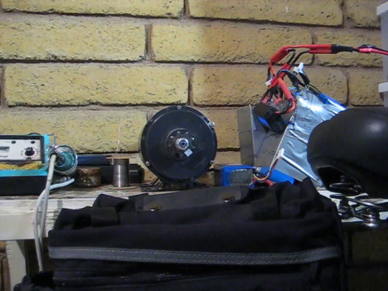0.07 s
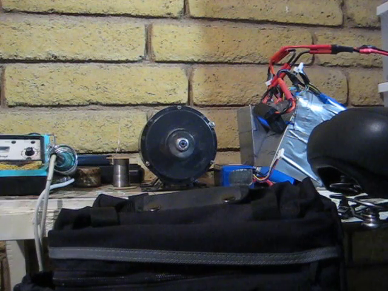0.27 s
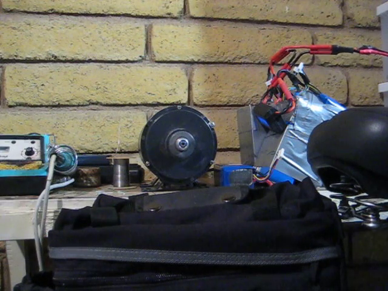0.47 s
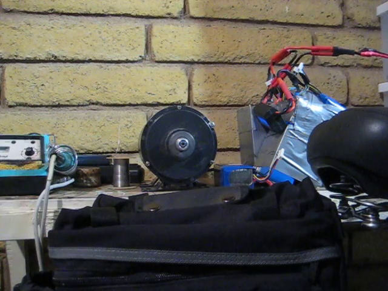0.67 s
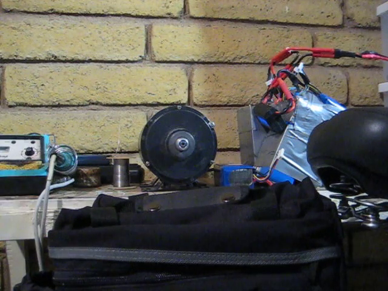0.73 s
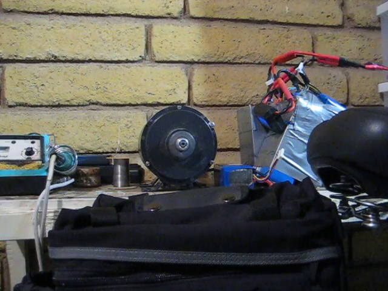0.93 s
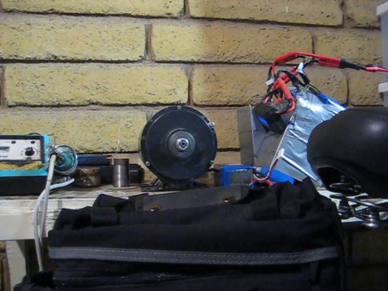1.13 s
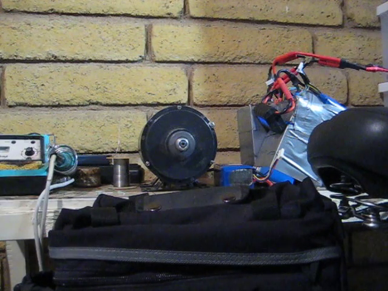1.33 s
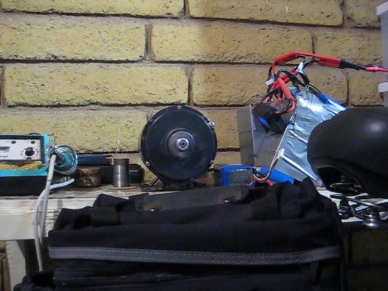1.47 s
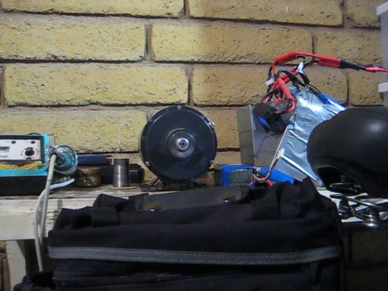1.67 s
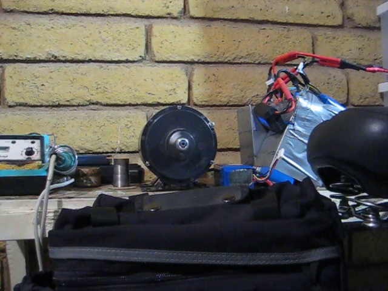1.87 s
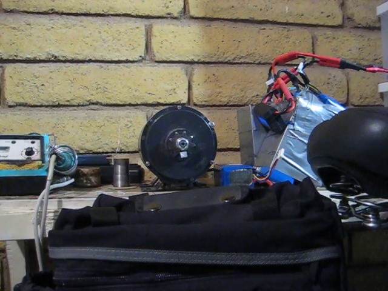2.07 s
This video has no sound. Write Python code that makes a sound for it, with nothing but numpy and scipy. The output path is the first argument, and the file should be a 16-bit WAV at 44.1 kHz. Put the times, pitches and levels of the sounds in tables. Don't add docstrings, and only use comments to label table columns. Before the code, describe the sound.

A small brushless electric motor on a workbench: faint room hum, a double click at 0.2 s, then a rough, gritty whine climbing fast until about 0.57 s. It holds a steady, hard, buzzing whine with thin high whistling until a sharp clack near 1.3 s. The pitch then falls, growling and rattling, fading to tiny knocks around 2 s, with a short room echo, close microphone.

```python
import sys
import numpy as np
from scipy import signal
from scipy.fft import rfft, irfft
from scipy.io import wavfile

SR = 44100
rng = np.random.default_rng(int(sys.argv[2]) if len(sys.argv) > 2 else 0)


def volts(x):
    e = np.asarray(x, float) / 20
    return 10 ** e


def transcribe(signal):
    frames = np.atleast_2d(signal).T
    limited = np.clip(frames, -1, 1)
    pcm = np.round(limited * 32767).astype(np.int16)
    wavfile.write(sys.argv[1], SR, pcm)


N = 92610
T = np.arange(N) / SR

FULL_HZ, STEPS_PER_TURN, CHOPPER_HZ = 540.82, 16, 16048.
BRAKE_ON_S, DRIVE_OFF_S, WHISTLE_TOP_HZ = 1.28, 1.54, 13600
FRONT_PASSES, REAR_PASSES = 4.9262, 4.9068

# t/s, speed/share of full
SPEED = [(.197, .1), (.24, .231), (.3, .337), (.35, .416), (.398, .473), (.448, .575), (.472, .655),
         (.518, .812), (.568, 1), (1.275, 1), (1.31, .94), (1.38, .843), (1.46, .74), (1.54, .64),
         (1.63, .53), (1.77, .355), (1.92, .165), (2.0, .07)]
# t/s, notch shake level/dB, drive current level/dB, magnet level/dB, rattle level/dB
RUN = [(.197, 7, -18, -25, -5.5), (.25, 6, -2, -19, 10), (.32, 10, 0.5, -13, 11), (.37, 3, 0.5, 1.5, 8),
       (.44, 2, -0.5, 5.5, 7.5), (.485, 0, 1, -16, 9), (.568, 1, 0, -1, 7.5), (.6, 0, 0, 0, 0),
       (1.275, 0, 0, 0, 0), (1.3, -2, -13, -6, 6), (1.38, -2, -7.5, -2, 9.5), (1.5, 3.5, -8, -2, 4.5),
       (1.57, 5.5, -15, 3.5, 1), (1.64, 7, -22.5, 4.5, -2.5), (1.7, 4.5, -28, -5.5, -6),
       (1.81, 9, -45, -6, -24), (1.92, 2, -44, -19, -35), (1.97, -9, -57, -30, -40)]
# t/s, once-a-step cogging level/dB, bright grit level/dB, end-bell ring level/dB (not sounded)
SHAKE = [(.197, -25, -20, -24), (.25, -25, 7.5, -8), (.4, -14, 8.5, -4), (.46, -9, 8, -1), (.52, -8, 9, 1),
         (.555, 6.5, 10, 2), (.6, -0.5, 8, -17), (1.275, 0.5, 8, -21), (1.31, 8, 8, -9), (1.39, 2.5, 9, -2),
         (1.44, 12, 5, 2), (1.52, 12, -4, 12), (1.56, 10, -15, 2.5), (1.62, 6, -28, 0),
         (1.67, -18, -25, -10), (1.8, -25, -30, -21), (1.97, -36, -40, -32)]
# rate/multiple of the step rate, level at full speed/dB
DRIVE = [(3, -40), (4, -21), (5, -33), (7, -56), (8, -45), (9, -52), (10, -48), (11, -52), (13, -56),
         (14, -53), (15, -58), (16, -62), (17, -64)]
# rate/multiple of the step rate, level as if at full speed/dB
PULL = [(4, -27.5), (5, -26.5), (6, -38), (7, -46), (8, -45.5), (9, -50.5), (10, -49), (11, -55.5),
        (12, -57), (13, -58.5), (14, -61)]
# rate/cycles per turn, level at full speed/dB
COGGING = [(30, -58), (32, -48.5), (35, -45.5), (36, -53)]
# rate/cycles per turn, level at full speed/dB
ROTOR = [(14, -58), (15, -60), (17, -42), (18, -37), (19, -31), (20, -46), (21, -51), (22, -58), (33, -62),
         (36, -60), (37, -54), (44, -56), (46, -58), (49, -44), (50, -53), (62, -40), (63, -46), (65, -40),
         (71, -42), (81, -47), (82, -42), (86, -46), (130, -52), (132, -52), (158, -55)]
# rate/multiple of the ball pass rate, level at full speed/dB
FRONT = [(11, -54), (12, -44), (14, -46), (15, -39), (16, -40), (17, -33), (21, -57), (25, -52)]
# rate/multiple of the ball pass rate, level at full speed/dB
REAR = [(18, -40), (19, -29), (20, -39), (28, -52), (35, -52)]
# distance below the chopper/steps, level at full speed/dB
CHOPS = [(2, -75), (3, -75), (4, -64), (5, -70), (6, -60), (7, -61), (8, -64), (9, -56), (10, -60),
         (11, -57), (12, -66), (14, -53), (16, -53), (18, -58), (20, -52)]
# t/s, peak level/dB
LURCHES = [(0.434, -11), (1.547, -13), (1.564, -19), (1.609, -11), (1.639, -13.5), (1.722, -18.5),
           (1.744, -21), (1.799, -19), (1.883, -25.5), (1.892, -26), (1.904, -25.5), (1.916, -25.5)]
# f/Hz, width/Hz, level/dB
HOUSING = [(280, 80, -18), (637.5, 52, -1.5), (1146, 290, -21.5), (1570, 303, -13), (1964, 150, -5.5),
           (2236, 74, 0), (2432, 116, -0.5), (2790, 220, -1), (3123, 63, 4), (3334, 100, -9),
           (4410, 500, -15.5), (5640, 1200, -19.5), (8000, 1700, -27), (12200, 3300, -45.5)]
# f/Hz, width/Hz, level/dB
SHELL = [(3690, 260, -10.5), (4280, 460, 2), (5120, 480, -4), (5860, 410, -5), (6970, 450, -8),
         (7570, 350, -8), (8400, 690, -11.5), (9880, 270, -14), (11500, 1400, -25.5), (12800, 700, -23.5)]
# f/Hz, width/Hz, level/dB
END_BELL = [(3100, 39, 0.5), (2846, 94, -9.5), (2310, 52, -14)]
# f/Hz, width/Hz, level/dB
MOUNT = [(279, 70, -13), (648.7, 34, 2.5)]
# f/Hz, width/Hz, level/dB
WHISTLE = [(13360, 1600, 0.5), (9750, 310, 4.5), (8000, 7700, -1.5)]
# t/s, peak level/dB, dullness/0-1
CLACKS = [
    (0.199, -27, 0.44),
    (0.2131, -28, 0.4),
    (1.293, -6.5, 0.38),
    (1.3, -20.5, 0.6),
    (1.536, -30, 0.4),
    (1.8027, -44, .3),
    (1.992, -30, 1),
    (2.008, -37, 0.3),
    (2.012, -25, 0.6),
    (2.021, -32, 0.6),
]
# f/Hz, level/dB, time to fall 60 dB/s
BENCH = [(296, -15, 0.081), (1010, -28, 0.033), (1360, -2, 0.023), (1900, 7, 0.012), (2840, 5, 0.0089),
         (5700, 1.5, 0.0092), (8380, -4, 0.0092), (9320, -2, 0.0093), (12100, -39, .008)]
# f/Hz, level/dB
AIR = [(25, -10.5), (100, -3.5), (330, -4.5), (650, -4), (1300, -11.5), (4000, -18.5), (10000, -24),
       (16000, -26)]
# f/Hz, level/dB
HUM = [(99, -62), (7558, -64), (5932, -72)]


def in_time(rows):
    s, *columns = np.transpose(rows)
    return [np.interp(T, s, column) for column in columns]


def drift(rate):
    knots = rng.standard_normal(int(N / SR * 60) + 2)
    return np.interp(T * rate, np.arange(len(knots)), knots)


def butter(x, order, hz, kind="low"):
    return signal.sosfilt(signal.butter(order, hz, kind, fs=SR, output="sos"), x)


def resonators(peaks):
    for k, (hz, width, db) in enumerate(peaks):
        r = np.exp(-np.pi * width / SR)
        b = volts(db) * (-1) ** k * (1 - r * r) / 2 * np.array([1, 0, -1])
        yield b, [1, -2 * r * np.cos(2 * np.pi * hz / SR), r * r]


def ring(x, peaks):
    return sum(signal.lfilter(b, a, x) for b, a in resonators(peaks))


def ring_gain(peaks, hz):
    return abs(sum(signal.freqz(b, a, [hz], fs=SR)[1][0] for b, a in resonators(peaks)))


def tones(turns, rows, peaks, base_hz=0, flutter_db=0):
    out = 0
    for per_turn, db in rows:
        full_speed_hz = base_hz + per_turn * FULL_HZ / STEPS_PER_TURN
        level_db = db + 0.6 * drift(12.1) + flutter_db * drift(35.1)
        gain = volts(level_db) * np.sqrt(2) / ring_gain(peaks, full_speed_hz)
        out = out + gain * np.sin(2 * np.pi * (base_hz * T + per_turn * turns + rng.random()))
    return out


def motor():
    notch_db, current_db, magnet_db, rattle_db = in_time(RUN)
    cog_db, bright_db, bell_db = in_time(SHAKE)
    speed, = in_time(SPEED)
    on = (T > RUN[0][0]) * np.clip((RUN[-1][0] - T) / 0.02, 0, 1)
    load = np.minimum((1 - speed) * 20, 1)
    turns = np.cumsum(speed * on) * FULL_HZ / STEPS_PER_TURN / SR
    kicks = step_kicks(turns, load)
    dull, bright = grit(speed, load)
    force = volts(current_db) * (drive_steps(turns, speed, load) + volts(-18.5) * kicks)
    force += cogging(turns, speed, load, magnet_db, cog_db)
    force += volts(36 * (speed - 1)) * tones(turns, ROTOR, HOUSING)
    force += volts(rattle_db) * dull + bearings(turns, speed)
    shove = kicks * on * volts(-17 + notch_db + 2.14 * drift(29.93)) + lurches()
    low = butter(ring(shove, MOUNT) + ring(force * on, HOUSING), 4, 240, "high")
    shell = ring(bright * on * volts(bright_db - 23.5), SHELL)
    end_bell = 0
    whistle = chopper(turns, speed, load, current_db, rattle_db) * on * (T < DRIVE_OFF_S)
    return low + shell + end_bell + ring(whistle, WHISTLE)


def drive_steps(turns, speed, load):
    flutter_db = 2.5 * load
    drive, pull = (tones(turns, [(k * STEPS_PER_TURN, db) for k, db in rows], HOUSING, 0, flutter_db)
                   for rows in (DRIVE, PULL))
    return drive * volts(85 * (speed - 1)) + butter(pull, 4, 1440, "high") * load


def step_kicks(turns, load):
    steps = np.floor(turns * STEPS_PER_TURN + 0.04 * drift(50))
    new_step = np.diff(steps, prepend=0) > 0
    return new_step * volts(5.5 * rng.standard_normal(N)) * np.sqrt(SR / FULL_HZ) * load


def cogging(turns, speed, load, magnet_db, cog_db):
    flutter_db = 2.5 * load
    teeth = volts(magnet_db) * tones(turns, COGGING, HOUSING, 0, 5 * load)
    once_a_step = volts(cog_db) * tones(turns, [(STEPS_PER_TURN, -40)], HOUSING, 0, flutter_db)
    surge = tones(turns, [(3 * STEPS_PER_TURN / 2, -37)], HOUSING, 0, flutter_db)
    starting = np.clip((0.46 - speed) * 20, 0, 1) * (T < 1)
    return teeth + once_a_step + starting * surge


def grit(speed, load):
    rough = rng.standard_normal(N) * volts(2 * rng.standard_normal(N))
    rub = volts(-7.5 + 1.56 * drift(50.1)) * signal.lfilter([1, -.8], [1], rough)
    dull = butter(rub, 4, 3400)
    climbing = load * (T < BRAKE_ON_S) * np.clip((1 - speed) * 2, 0, 1)
    return dull + climbing * (butter(rub, 4, 2650) - dull), rub - dull


def bearings(turns, speed):
    balls = sum(tones(turns, [(k * passes, db) for k, db in rows], HOUSING)
                for passes, rows in ((FRONT_PASSES, FRONT), (REAR_PASSES, REAR)))
    return balls * (1 + 0.41 * np.sin(2 * np.pi * turns)) * volts(42 * (speed - 1))


def lurches():
    knocks = np.full(N, 1e-18)
    for s, db in LURCHES:
        knocks[int(s * SR)] += volts(db + 41)
    return butter(knocks, 2, [517, 776], "band")


def chopper(turns, speed, load, current_db, rattle_db):
    braking = T > BRAKE_ON_S
    out = 0
    for k, db in CHOPS:
        hz = CHOPPER_HZ - k * speed * FULL_HZ
        too_high_db = np.clip((hz - WHISTLE_TOP_HZ) / 20, 0, 30)
        change_db = 4 - braking - 2 * max(k - 6, 0) - too_high_db + .5 * np.minimum(rattle_db, 0)
        out = out + volts(load * change_db) * tones(turns, [(-k * STEPS_PER_TURN, db)], WHISTLE, CHOPPER_HZ)
    hiss_db = np.where(T < BRAKE_ON_S, -35.5 + .5 * current_db, -69 + .5 * rattle_db)
    return out + load * volts(hiss_db) * butter(rng.standard_normal(N), 8, WHISTLE_TOP_HZ)


def clacks():
    hits, rustle, t = np.full(N, 1e-18), np.zeros(N), np.arange(SR // 5) / SR
    for s, db, dull in CLACKS:
        i, dull = int(s * SR), np.clip(dull, 0, .97)
        noise = signal.lfilter([np.sqrt(1 - dull ** 2)], [1, -dull], rng.standard_normal((2, len(t))))
        noise = noise[:, :N - i] * volts(db)
        hits[i:i + len(t)] += noise[0] * np.exp(-t[:N - i] / 0.0014)
        rustle[i:i + len(t)] += noise[1] * np.exp(-t[:N - i] / 0.031) * volts(-15)
    hits, rustle = butter([hits, rustle], 2, 250, "high")
    out = rustle + volts(-17) * hits
    for hz, db, t60 in BENCH:
        r, w = volts(-60 / (t60 * SR)), 2 * np.pi * hz / SR
        out += signal.lfilter([0, volts(db - 24) * np.sin(w)], [1, -2 * r * np.cos(w), r * r], hits)
    return out


def room(x):
    t = np.arange(SR // 2) / SR
    tail = signal.lfilter([1], [1, -.6], rng.standard_normal(len(t)))
    tail *= volts(-60 * t / 0.39) * (t > .006)
    return volts(-15) * signal.fftconvolve(x, tail / np.sqrt(np.sum(tail ** 2)))[:N]


def air():
    hz, db = np.transpose(AIR)
    shape = volts(np.interp(np.log(np.arange(N // 2 + 1) * SR / N + 1), np.log(hz), db))
    noise = irfft(rfft(rng.standard_normal(N)) * shape, N)
    out = volts(-44) * noise / np.sqrt(np.mean(noise ** 2))
    return out + sum(volts(db + 2.5 + 2 * drift(14)) * np.sin(2 * np.pi * hz * T) for hz, db in HUM)


def scene():
    near = motor() + clacks()
    return (near + room(near) + air())[None]


def band_limit(x):
    return signal.sosfilt(signal.butter(12, 16720, fs=SR, output="sos"), x)


def record(dry):
    mix = signal.sosfilt(signal.cheby2(10, 50, 15950, fs=SR, output="sos"), dry)
    return band_limit(mix)


dry = scene()
out = record(dry)
transcribe(out)
```